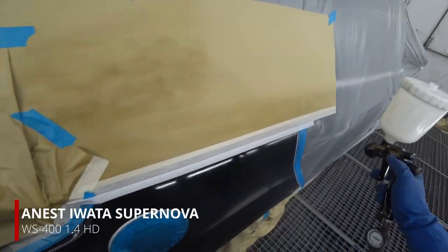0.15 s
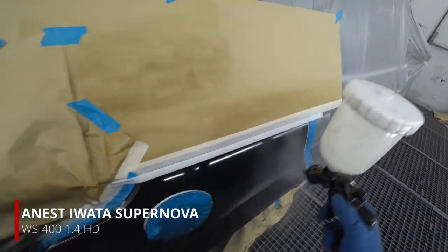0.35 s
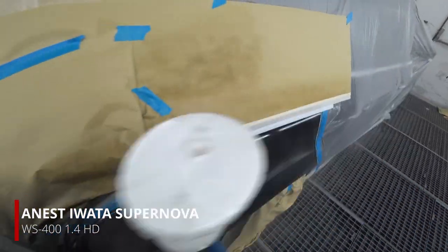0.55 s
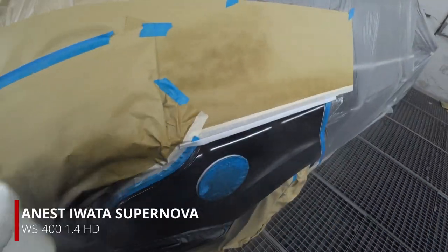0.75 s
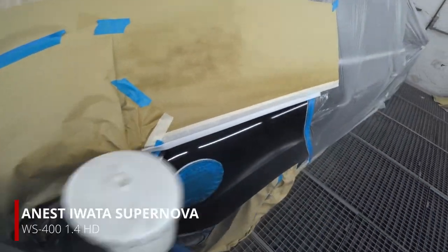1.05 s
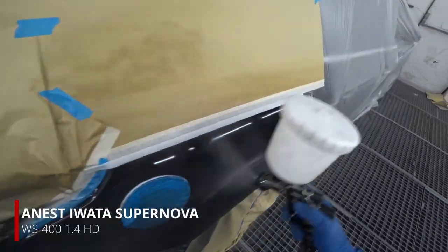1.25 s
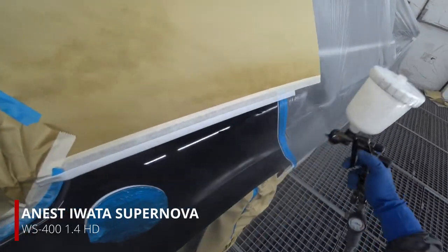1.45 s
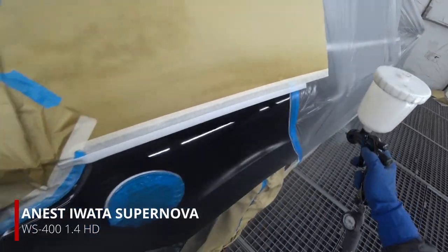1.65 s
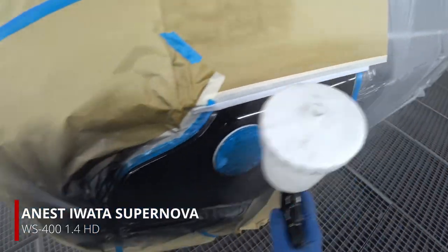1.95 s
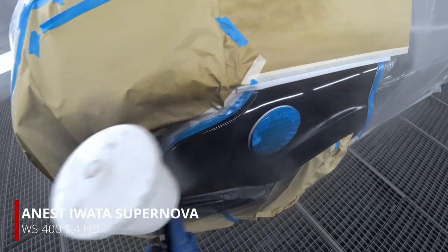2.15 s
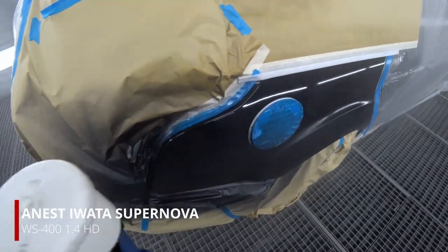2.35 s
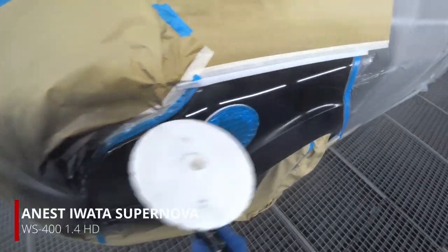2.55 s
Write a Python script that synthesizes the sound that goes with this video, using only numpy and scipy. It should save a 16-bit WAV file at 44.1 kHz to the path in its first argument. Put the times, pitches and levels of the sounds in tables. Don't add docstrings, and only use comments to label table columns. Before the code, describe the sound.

Spray gun hissing in sweeping passes over a masked car panel, with brief gaps between strokes

```python
import sys
import numpy as np
from scipy import signal
from scipy.fft import rfft, irfft
from scipy.io import wavfile
from scipy.ndimage import uniform_filter1d

SR = 44100
rng = np.random.default_rng(int(sys.argv[2]) if len(sys.argv) > 2 else 0)


def volts(x):
    e = np.asarray(x, float) / 20
    return 10 ** e


def master(y):
    cut = np.clip(np.atleast_2d(y).T, -1, 1)
    pcm = np.round(cut * 32767)
    wavfile.write(sys.argv[1], SR, pcm.astype(np.int16))


N = 119070
HOP = 128


def evened(x):
    return x / np.sqrt(np.mean(np.abs(x) ** 2) + 1e-20)


def read(points, hz):
    f, value = np.transpose(points)
    return np.interp(np.log(hz + 1), np.log(f + 1), value)[:, None]


def noise(level_db, same, balance_db=0., phase_rad=0., size=512):
    hop = size // 4
    a, b, c, d = rng.standard_normal((N // hop + 5, size // 2 + 1, 4)).T
    same = np.clip(same, 0, 1)
    one, other = a + 1j * b, c + 1j * d
    half = volts(balance_db / 2) * np.exp(.5j * phase_rad)
    left = one * half
    right = (same * one + np.sqrt(1 - same ** 2) * other) / half
    z = np.array([left, right]) * volts(level_db)
    return signal.istft(z, nperseg=size, noverlap=size - hop)[1][:, :N]


def patches(shape, bins, frames):
    field = rng.standard_normal(shape[::-1]).T
    for _ in range(2):
        field = uniform_filter1d(uniform_filter1d(field, bins, 0), frames, 1)
    return evened(field)


def ports(hz, place):
    # freq_hz, left_minus_right_db, left_lead_rad, likeness
    at_right = [(300, -.3, .1, 1), (1100, -3.5, .5, .88), (1550, -.6, .6, .82), (2200, -.7, .15, .97),
                (4700, -1.2, 0, .99), (7700, -.2, 0, 1), (11000, .2, -.4, .95), (15000, .5, -.7, .87)]
    at_centre = [(300, -.4, .1, 1), (1100, -.5, .35, .93), (1550, 0, .05, .99), (4700, 0, 0, 1),
                 (7700, 1.3, .3, .98), (9200, 3, .2, .97), (11000, 3, 0, .99), (15000, 1.5, 0, .99)]
    at_left = [(300, 0, .15, 1), (700, 2.8, .2, .97), (1550, 5.2, 0, .88), (2200, 2.6, 0, .96),
               (4700, 4.2, .1, .97), (6200, 4, .45, .91), (9200, 5, 1.2, .88), (15000, 4.2, 2.0, .66)]
    centre = .4
    right = np.clip(1 - place / centre, 0, 1)
    left = np.clip((place - centre) / (1 - centre), 0, 1)

    def column(table, k):
        return read([(row[0], row[k]) for row in table], hz)

    return [right * column(at_right, k) + (1 - right - left) * column(at_centre, k) + left * column(at_left, k)
            for k in (3, 1, 2)]


def swing(t):
    # time_s, jet_db, cap_turn (0 right - 1 left), contact_db
    path = [(0, -27.5, 0.19, -16.5), (.2, -28, 0, -13), (.4, -26.5, 0.26, -7.5), (.56, -27, 0.48, -8),
            (.63, -27, 0.7, 0), (.85, -32.5, 0.74, -6), (1.0, -31.5, 0.39, -9), (1.08, -30, 0.91, -2),
            (1.19, -29.5, 0.76, -1), (1.23, -26, .7, -14), (1.6, -28, 0, -10.5), (2.04, -28, 0.18, -18.5),
            (2.089, -27.5, 0.37, -1.5), (2.24, -28.5, 0.48, -3), (2.3, -28.5, 0.34, -9),
            (2.45, -30, 0.32, -7), (2.55, -31, 0.63, -2.5), (2.7, -28, 1, -9)]
    time_s, *columns = np.transpose(path)
    return [np.interp(t, time_s, column) for column in columns]


def air(spectrum, patch_db, flicker_db):
    # time_s, place (0 right - 1 left)
    gun_place = [(0, .25), (.2, 0), (.4, .17), (.54, .4), (.65, .72), (.85, 1), (1.02, 1), (1.2, .75),
                 (1.33, .4), (1.55, .05), (1.75, 0), (2.0, .27), (2.17, .43), (2.3, .75), (2.48, .88),
                 (2.7, .7)]
    hz, t = np.fft.rfftfreq(512, 1 / SR), np.arange(N // HOP + 5) * HOP / SR
    field = spectrum(hz, swing(t)[1])
    field = field - 10 * np.log10(np.mean(volts(field) ** 2, axis=0))
    shape = (len(hz), len(t))
    field = field + patch_db * patches(shape, bins=6, frames=14)
    field = field + flicker_db * patches(shape, bins=50, frames=2)
    return evened(noise(field, *ports(hz, np.interp(t, *np.transpose(gun_place)))))


def trigger(t):
    # open_s, shut_s
    pulls = [
        (-.3, 0.084),
        (0.181, 0.8586),
        (0.975, 1.592),
        (1.667, 2.321),
        (2.425, 3.0),
    ]
    open_s, open_curve, shut_s = 0.0098, 1.7, 0.015
    bleed_db, bleed_s = -14, .028
    flow = 0
    for on, off in pulls:
        rise = np.clip((t - on) / open_s, 0, 1) ** open_curve
        valve = np.clip(1 - (t - off) / shut_s, 0, 1)
        bleed = volts(bleed_db) * np.exp(-np.maximum(t - off, 0) / bleed_s)
        flow = flow + rise * np.maximum(valve, bleed)
    return flow


def gun(t):
    # freq_hz, level_db
    jet_right = [(600, -26), (1000, -25), (1420, -23), (1800, -12), (4670, -7), (8080, 1), (11200, -0.5),
                 (15800, -5.5)]
    jet_left = [(600, -42), (1000, -21), (1420, -12), (1800, -18.5), (3500, -14), (7340, 1), (9920, -4),
                (15800, -6.5)]
    # right_hz, left_hz, width_hz, level_db
    cap_ridges = [(8100, 6800, 750, 2.4), (11400, 9400, 750, 3.2), (9500, 8400, 400, -2),
                  (5700, 2300, 500, 4), (13300, 11500, 600, 1.5)]
    # freq_hz, level_db
    roar_spectrum = [(150, -10.5), (500, -4.5), (1100, -1), (1450, -1), (2000, 1.5), (4000, 3.5), (6000, 6),
                     (10000, -34)]
    roar_db = -35
    shade_hz, shade_db = 12400, -4.5

    def jet(hz, turn):
        right, left = read(jet_right, hz), read(jet_left, hz)
        field = right + turn * (left - right)
        for right_hz, left_hz, width_hz, db in cap_ridges:
            centre_hz = right_hz + turn * (left_hz - right_hz)
            field = field + db * np.exp(-.5 * ((hz[:, None] - centre_hz) / width_hz) ** 2)
        contact = volts(swing(np.arange(len(turn)) * HOP / SR)[2])
        return field + shade_db * contact / (1 + (shade_hz / (hz[:, None] + 1)) ** 8)

    def on_paper(hz, turn):
        return read(roar_spectrum, hz)

    level_db, _, contact_db = swing(t)
    hiss = volts(level_db) * air(jet, patch_db=1.71, flicker_db=0.8)
    roar = volts(roar_db + contact_db) * air(on_paper, patch_db=-0.5, flicker_db=1.0)
    return trigger(t) * (hiss + roar)


def booth(x):
    # freq_hz, t60_s
    decay = [(1000, .36), (3000, .29), (8000, .26), (15000, .2)]
    # freq_hz, likeness
    tail_same = [(300, 0.5), (1200, 0.56), (4000, 0.58), (9000, 0.66), (15000, 0.36)]
    t = np.arange(N // 64 + 5) * 64 / SR
    hz = np.fft.rfftfreq(256, 1 / SR)
    tail = noise(-60 * t / read(decay, hz), read(tail_same, hz), size=256)[:, :SR // 2]
    tail[:, :200] = 0
    return signal.fftconvolve(x.mean(0)[None], tail / np.linalg.norm(tail[0]), axes=1)[:, :N]


def fan(t):
    # freq_hz, level_db
    rumble = [(18, -39), (30, -0.5), (113, 0), (629, -11), (1140, -12), (1870, -14.5), (6360, -19.5),
              (15000, -50)]
    # freq_hz, likeness
    rumble_same = [(100, 1), (400, .99), (1200, .8), (6000, .6)]
    # freq_hz, rms_db
    hum_lines = [(86.1, -63), (285.3, -67), (516.8, -71.5), (613.7, -69)]
    rumble_db = -52
    hz = np.fft.rfftfreq(2048, 1 / SR)
    field = read(rumble, hz) + 1.27 * patches((len(hz), N // 512 + 5), bins=20, frames=6)
    out = volts(rumble_db) * evened(noise(field, read(rumble_same, hz), size=2048))
    for line_hz, db in hum_lines:
        drift, swell = evened(uniform_filter1d(rng.standard_normal((2, N)), 5000, axis=1))
        phase_rad = 2 * np.pi * np.cumsum(line_hz + 3 * drift) / SR
        out = out + volts(db + 4.4 * swell) * np.sqrt(2) * np.sin(phase_rad)
    return out


def paper_flaps(t):
    # start_s, decay_s, level_db
    flaps = [
        (0.871, .008, -41),
        (0.881, 0.012, -35.5),
        (2.346, 0.0093, -40.5),
    ]
    # freq_hz, level_db
    rustle = [(1000, -30), (2000, -8), (3500, 0), (6500, -1), (8500, -14), (15000, -30)]
    envelope = 0
    for start_s, decay_s, db in flaps:
        rise = np.clip((t - start_s) / 0.0015, 0, 1)
        envelope = envelope + volts(db) * rise * np.exp(-np.maximum(t - start_s, 0) / decay_s)
    return envelope * air(lambda hz, turn: read(rustle, hz), patch_db=1.1, flicker_db=4)


def scene():
    t = np.arange(N) / SR
    booth_db = -12.5
    near = gun(t) + paper_flaps(t)
    return near + volts(booth_db) * booth(near) + fan(t)


def band_limit(x):
    return signal.sosfilt(signal.butter(12, 16670, fs=SR, output="sos"), x)


def record(dry):
    duck_from_db, duck_share, recover_db_per_s, makeup_db = -43, 0.34, 166, 6.5
    edge_hz = 15830
    notch_hz, notch_width_hz, notch_db = 1390, 90, -4
    power_db = 10 * np.log10(abs(uniform_filter1d((dry ** 2).mean(0), 600)) + 1e-12)
    fall_db = np.arange(N) * recover_db_per_s / SR
    held_db = np.maximum.accumulate(power_db + fall_db) - fall_db
    over_db = np.maximum(held_db - duck_from_db, 0)
    ducked = dry * volts(makeup_db - duck_share * uniform_filter1d(over_db, 300))
    low_pass = signal.firwin(1023, edge_hz, window=("kaiser", 9), fs=SR)
    out = signal.oaconvolve(ducked, low_pass[None], "same")
    hz = np.fft.rfftfreq(N, 1 / SR)
    dip_db = notch_db * np.exp(-.5 * ((hz - notch_hz) / notch_width_hz) ** 2)
    return band_limit(irfft(rfft(out) * volts(dip_db), N))


dry = scene()
out = record(dry)
master(out)
```